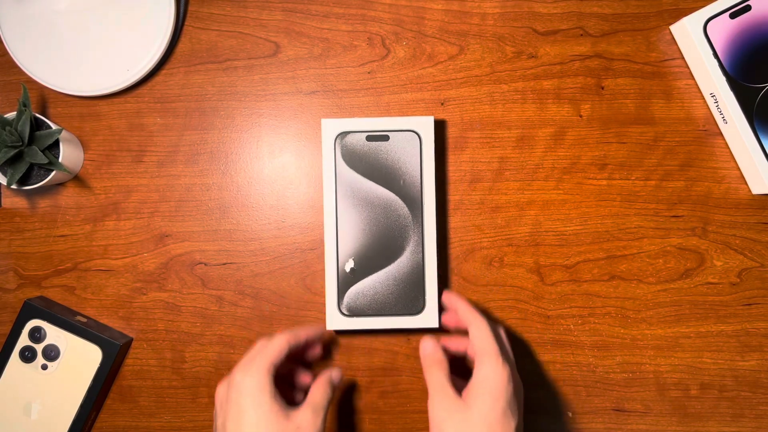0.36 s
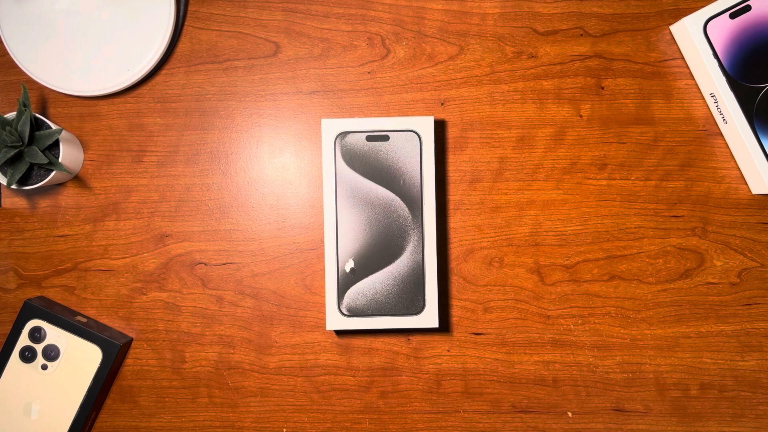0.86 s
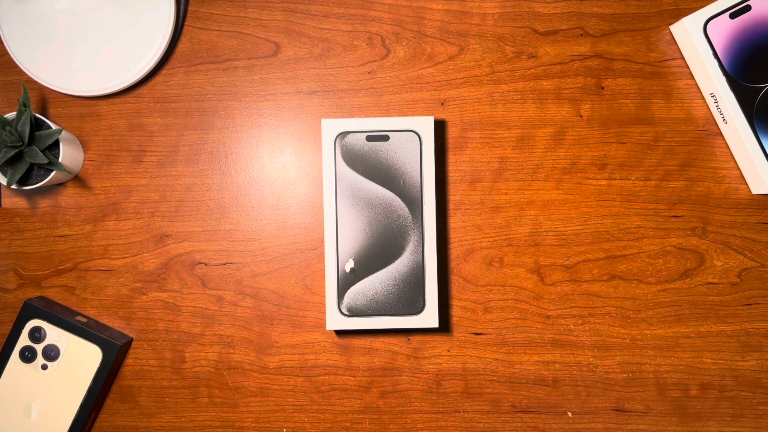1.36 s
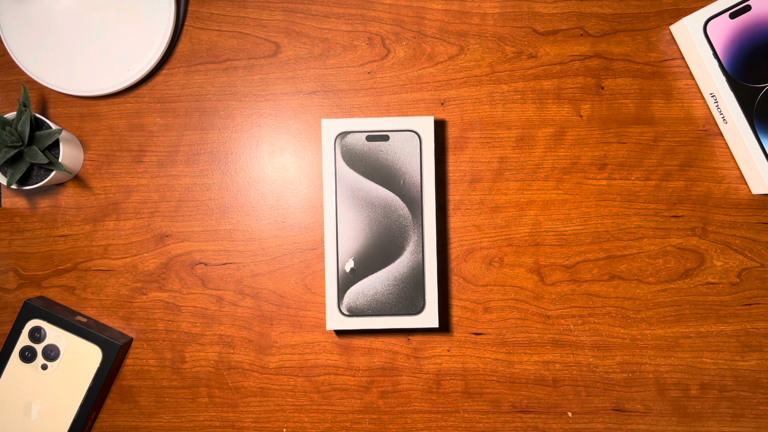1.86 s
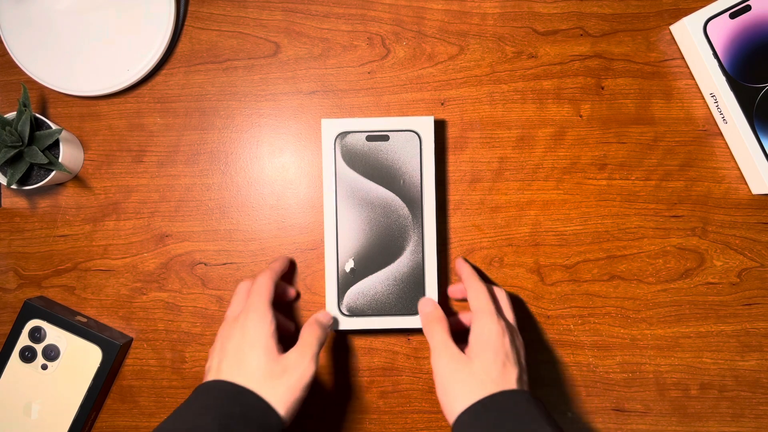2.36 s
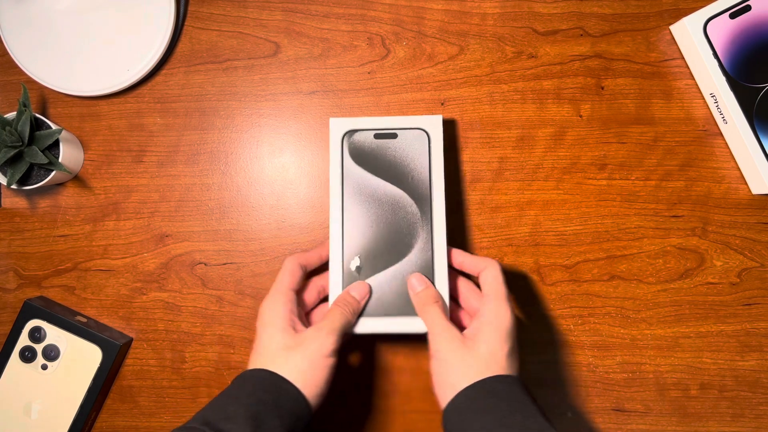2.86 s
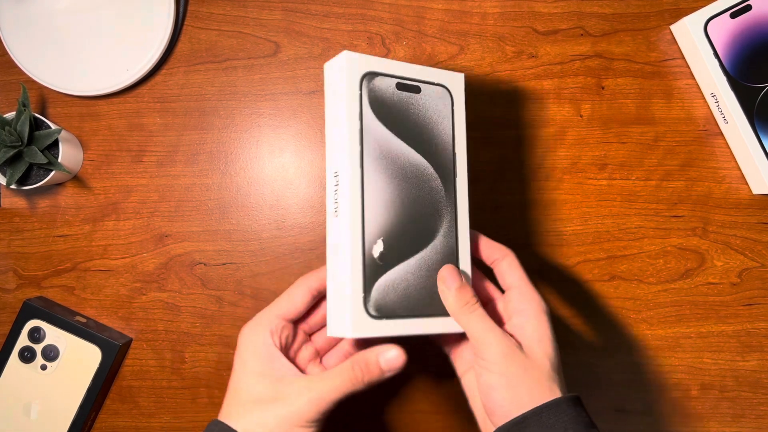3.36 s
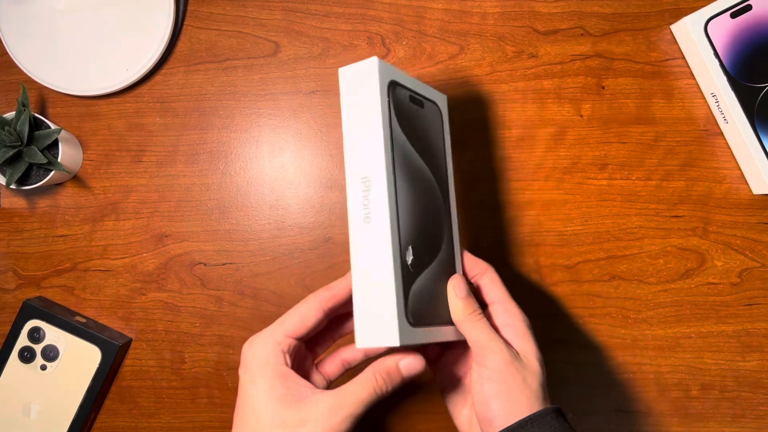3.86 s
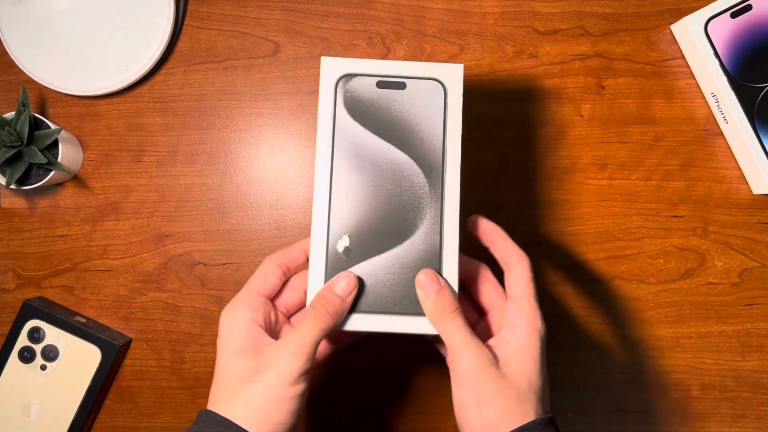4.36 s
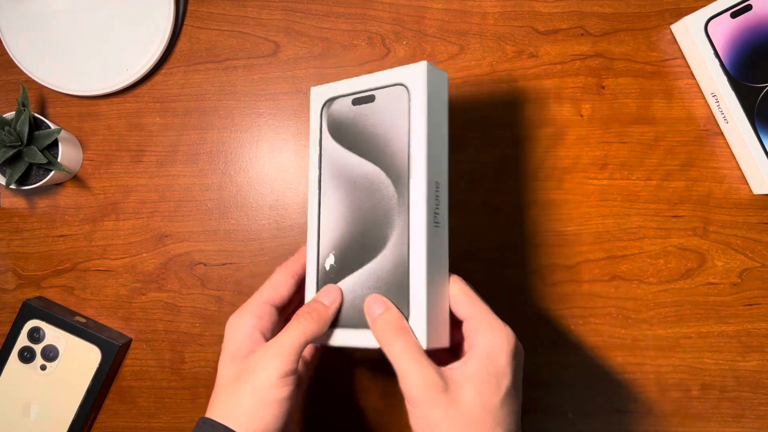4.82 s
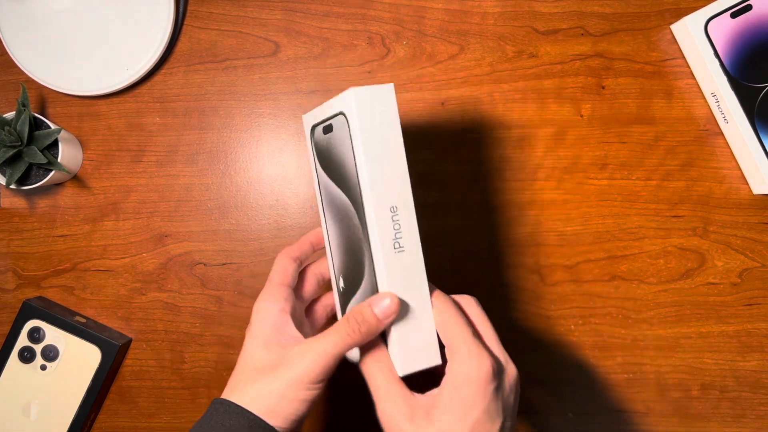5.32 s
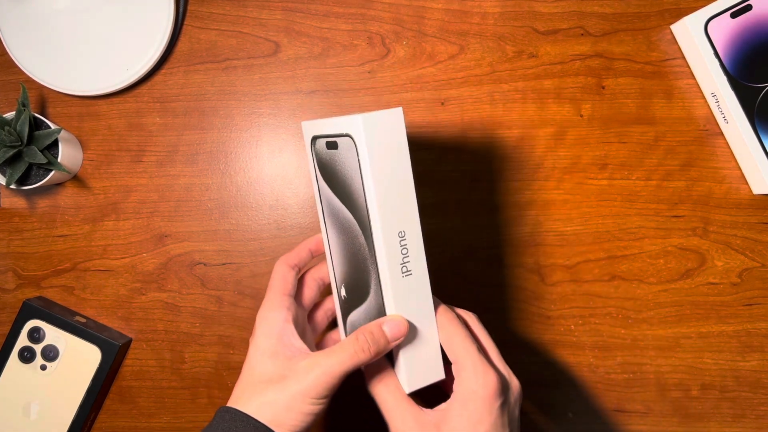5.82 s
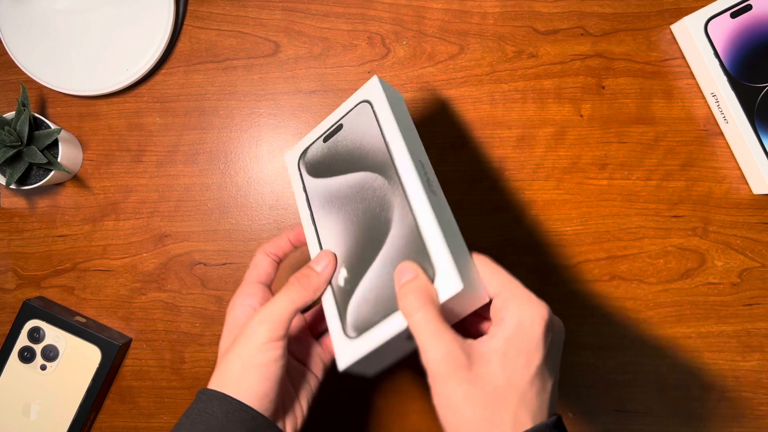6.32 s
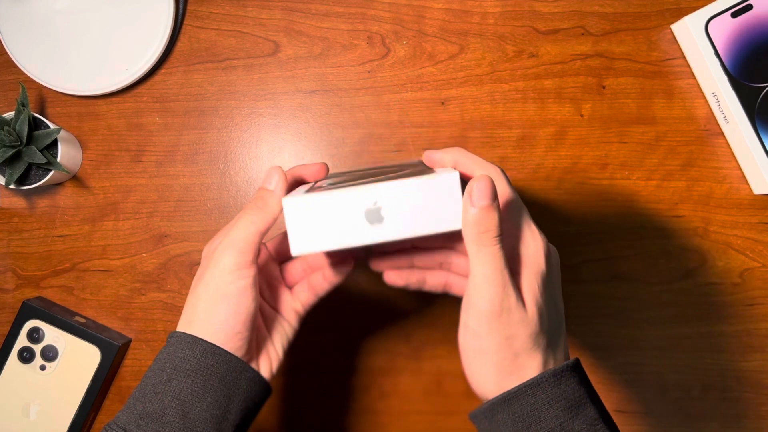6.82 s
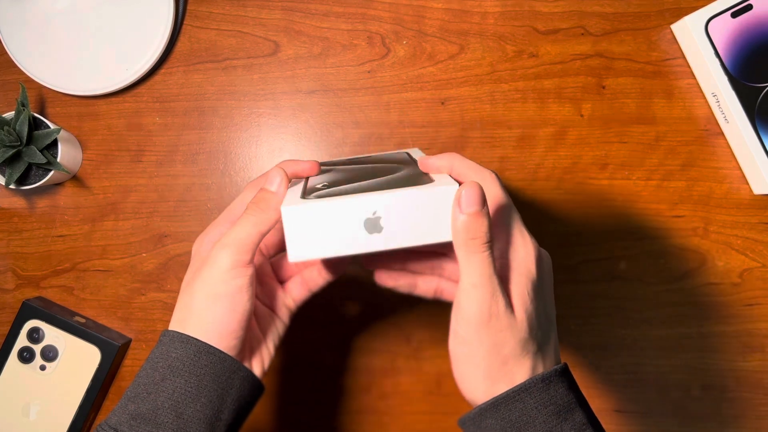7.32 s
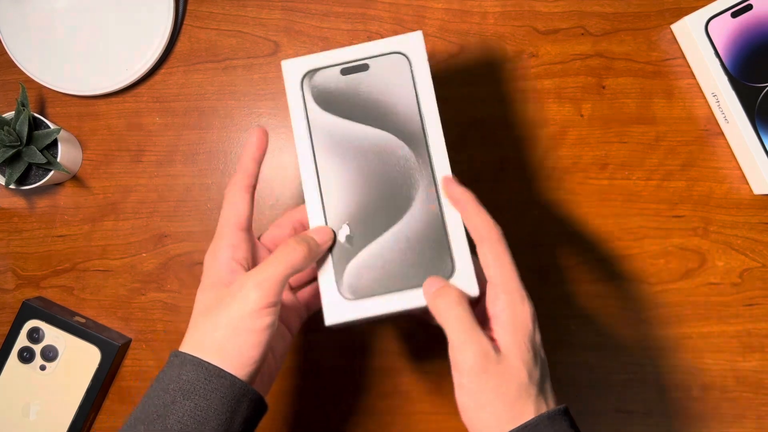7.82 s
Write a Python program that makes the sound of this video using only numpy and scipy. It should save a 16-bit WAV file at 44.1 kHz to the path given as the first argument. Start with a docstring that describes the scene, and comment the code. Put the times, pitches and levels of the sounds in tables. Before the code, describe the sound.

A quiet indoor room, heard close in stereo with a short room tail: low uneven rumble, smooth faint hiss and a barely audible hum early on. A wall clock gives a small double rattle about every second, starting near 0.75. At 0.1 to 0.8 there are two tiny finger touches and soft skin and sleeve rustle; then mostly ticking, with very faint rubbing from 1.5. From 2.35 to 2.7 fingers patter on a cardboard box on a wooden desk, and at 2.8 comes one loud, hollow knock, by far the strongest sound, with small contacts right after. A distant bird whistles thinly from 3.2 to 3.6. Light dry clicks cluster at 4.3 to 5.0, then a calmer second. From 6.0 to 6.8 the rustling is livelier with taps as the box is turned, and more small clicks and brushing follow at 7.4 to 7.85.

```python
"""At a wooden desk, fingers tap, lift and turn a small cardboard box close under a stereo microphone.
Contacts are noise clicks plus ringing modes of box and desk; one of them is a loud knock.
A wall clock rattles each second through resonances of its case; skin and sleeves rustle as patchy noise.
A far bird whistles in thin sine glides over a low noise rumble, a faint hum and hiss."""
import sys
import numpy as np
from scipy import signal
from scipy.fft import rfft, irfft, next_fast_len
from scipy.io import wavfile
from scipy.ndimage import uniform_filter1d, map_coordinates

SR = 44100
rng = np.random.default_rng(int(sys.argv[2]) if len(sys.argv) > 2 else 0)


def unload_wav(signal):
    """Save mono or channel-first audio to the path in sys.argv[1] as 16-bit WAV at rate SR, clipped to [-1, 1]."""
    wavfile.write(
        sys.argv[1],
        SR,
        np.round(np.clip(np.atleast_2d(signal).T, -1, 1) * 32767).astype(np.int16),
    )


def voltage_ratio(level):
    """Linear amplitude factor for a level in decibels (scalar or array-like)."""
    return 10 ** (np.asarray(level, float) / 20)


N = 350154  # length in samples


def unit(x):
    """Scale to rms 1."""
    return x / np.sqrt(np.mean(x ** 2) + 1e-20)


def along(points, hz):
    """Read a curve of (Hz, value) points on a log frequency axis."""
    f, v = np.transpose(points)
    return np.interp(np.log(hz + 1), np.log(f + 1), v)


def curve(rows):
    """One value per sample from (s, value) rows."""
    return np.interp(np.arange(N) / SR, *np.transpose(rows))


def wobble(rate):
    """A smooth random curve with rate knots a second."""
    knots = rng.standard_normal(int(N * rate / SR) + 4)
    return map_coordinates(knots, [np.arange(N) * rate / SR])


def filtered(x, response):
    """Multiply the spectrum of x by a complex response of frequency."""
    m = next_fast_len(x.shape[-1] + 8192)
    spectrum = rfft(x, m) * response(np.fft.rfftfreq(m, 1 / SR))
    return irfft(spectrum, m)[..., :x.shape[-1]]


def rush(spectrum, patchy_db):
    """Stereo noise of rms 1, partly alike in both ports, with patches of random gain in time and pitch."""
    # how alike the two ports hear the room: hz, likeness (0-1)
    alike = [(60, .92), (250, 0.84), (500, 0.44), (1000, 0.23), (1600, 1), (3000, 1), (5500, 0.69),
             (6800, 1), (8000, 0.35), (11000, 1), (12000, 1), (13000, 0.46)]
    z = signal.stft(rng.standard_normal((2, N)), nperseg=512)[2]
    field = uniform_filter1d(rng.standard_normal(z.shape[1:]), size=5, axis=0)
    field = uniform_filter1d(field, size=10, axis=1)
    pair = signal.istft(z * voltage_ratio(patchy_db * unit(field)), nperseg=512)[1][:, :N]

    def mid_side(hz):
        half_angle = np.arccos(np.clip(along(alike, hz), -1, 1)) / 2
        return voltage_ratio(along(spectrum, hz)) * [np.cos(half_angle), np.sin(half_angle)]

    mid, side = filtered(pair, mid_side)
    return unit(np.array([mid + side, mid - side]))


def add(track, s, sound):
    """Mix a short sound in at time s."""
    part = track[..., round(s * SR):][..., :sound.shape[-1]]
    part += sound[..., :part.shape[-1]]


def answer(x):
    """The room's tail, new for each sound: noise in which every frequency dies at its own speed."""
    # decay of the room: hz, t60_s
    room = [(100, 0.02), (400, 0.28), (1500, 0.31), (5000, 0.29), (12000, 0.02)]
    # left-right likeness of the tail, greatest in the lows: hz, likeness (0-1)
    tail_alike = [(100, 0.61), (350, 0.74), (600, 0.38), (2000, 0.18), (5000, 0.31)]
    hz, t, (a, b) = signal.stft(rng.standard_normal((2, SR // 2)), SR, nperseg=256)
    half_angle = np.arccos(np.clip(along(tail_alike, hz), -1, 1))[:, None] / 2
    mid, side = np.cos(half_angle) * a, np.sin(half_angle) * b
    decay = voltage_ratio(-60 * t / along(room, hz)[:, None])
    tail = signal.istft(np.array([mid + side, mid - side]) * decay, SR, nperseg=256)[1]
    late = np.pad(x, (200, 0))[None]  # the tail starts 200 samples late
    return signal.fftconvolve(late, tail / np.linalg.norm(tail[0]), axes=1)


def room_tone():
    """Uneven low rumble of the building and a wavering sine hum under a smooth hiss."""
    # course of the rumble before its wobble: time_s, level_db
    rumble_course = [(0.0, -54.5), (0.37, -59), (2.1, -60), (2.76, -54.5), (3.01, -59.5), (4.44, -64),
                     (5.2, -60.5), (7.2, -62.5), (7.55, -66), (7.94, -57.5)]
    # colour of the rumble: hz, density_db (per Hz, relative)
    air = [(12, -34), (20, -43), (36, -7.5), (64, 0.5), (108, -10), (166, -5.5), (201, -18), (222, -7),
           (256, -19), (286, -14), (325, -23.5), (387, -25), (426, -26), (461, -29.5), (900, -40),
           (1170, -77), (1980, -120)]
    # colour of the hiss: hz, density_db (per Hz, relative)
    hiss_colour = [(410, -29), (700, -15.5), (1210, -14.5), (1760, -1), (2600, -6), (2960, -13), (3290, -4),
                   (4000, -6.5), (4490, -2.5), (5830, -14), (6810, -12.5), (9070, -54), (11500, -24),
                   (12600, -18), (15700, -40)]
    # course of the faint hum before its wobble: time_s, level_db
    hum_course = [(.4, -85), (1, -79), (2.1, -78.5), (2.3, -92)]
    rumble = voltage_ratio(curve(rumble_course) + 0.9 * wobble(3.15) + 0.85 * wobble(18)) * rush(air, patchy_db=0.5)
    hum_hz = 425 + 3 * wobble(4.2)
    hum = voltage_ratio(curve(hum_course) + 2.3 * wobble(9.6)) * np.sin(2 * np.pi * np.cumsum(hum_hz) / SR)
    hiss = voltage_ratio(-72.5 + 1.3 * wobble(1.773)) * rush(hiss_colour, patchy_db=1.3)
    return rumble + hum + hiss


def bird():
    """Thin gliding whistles that swell, then stop short: sines with a straight glide in pitch."""
    # notes: start_s, length_s, from_hz, to_hz, level_db (once swelled)
    notes = [(3.19, 0.038, 4700, 5300, -74), (3.273, 0.065, 5330, 5430, -70),
             (3.417, .088, 5600, 4800, -63), (3.512, 0.098, 4120, 3670, -72.5)]
    swell_db, swell_share = 13, 0.62  # growth in dB, up to this share of the note
    out = np.zeros((2, N))
    for s, length, from_hz, to_hz, db in notes:
        u = np.arange(0, 1, 1 / (length * SR))  # share of the note gone by
        glide_hz = from_hz + (to_hz - from_hz) * u
        swell = voltage_ratio(db - swell_db * np.maximum(1 - u / swell_share, 0))
        tone = np.sin(2 * np.pi * np.cumsum(glide_hz) / SR) * swell
        # soft ends; a little stronger on the left
        add(out, s, tone * signal.windows.tukey(len(u), .3) * voltage_ratio([[.3], [-.3]]))
    return out


def rustle():
    """Sliding skin and cloth: each stroke of noise rises, holds and fades, catching unevenly."""
    # colour of the rustle as finally heard, with its gap near 9.7 kHz: hz, density_db (per Hz, relative)
    rustle_colour = [(880, -21), (1500, -8.5), (1760, -8), (7430, -3), (8780, -15), (9680, -71),
                     (10500, -5.5), (12400, -3.5), (13500, -3), (14500, -29), (15700, -9)]
    # strokes of skin and cloth: start_s, length_s, level_db (before the wobble)
    stroke_rows = [(0.16, 0.13, -78), (.32, 0.46, -75.5), (1.5, 0.48, -80.5), (1.95, 0.56, -76),
                   (2.562, 0.018, -70.5), (2.65, 0.026, -71), (2.74, 0.11, -68.5), (2.98, 0.22, -78.5),
                   (3.25, .07, -73.5), (4.055, .09, -74), (4.214, .13, -79.5), (4.412, 0.31, -76),
                   (4.788, .12, -72), (4.992, 0.026, -76), (5.974, 0.092, -74.5), (6.11, 0.042, -67.5),
                   (6.172, 0.13, -68.5), (6.318, 0.07, -67), (6.438, .16, -77), (6.61, 0.18, -73.5),
                   (6.817, 0.12, -78), (7.438, 0.28, -76), (7.769, 0.074, -70)]
    rise_db_s, fall_db_s, rest_db = 498, 204, -86  # dB a second up and down; level of hands at rest
    t = np.arange(N) / SR
    strokes = []
    for s, length, db in stroke_rows:
        before, after = np.maximum(s - t, 0), np.maximum(t - s - length, 0)
        strokes.append(db - rise_db_s * before - fall_db_s * after)
    level_db = np.maximum(np.max(strokes, axis=0), rest_db)
    catching_db = 1.5 * wobble(30) + 1.5 * wobble(300)
    return voltage_ratio(level_db + catching_db) * rush(rustle_colour, patchy_db=1.5)


def clock():
    """Each gear step is a burst of tiny knocks that rings the case of the clock and the wall behind it."""
    # once a second: release_s, release_db, delay_s until the gear lands, landing_db, rebound_db
    ticks = [(0.753, -57.5, .028, -51.5, -63), (1.752, -59, 0.036, -54, -72), (2.762, -46, 0.026, -54, -66),
             (3.757, -58, .032, -52, -72), (4.768, -49, 0.021, -48.5, -50), (5.764, -55, .039, -54, -70),
             (6.768, -50, .027, -51, -54), (7.778, -49.5, 0.017, -61, -67)]
    # resonances of the case: hz, width_hz, level_db
    case_modes = [(496, 140, -0.5), (826, 167, 0.5), (1465, 334, -0.5), (1956, 227, 2), (2390, 650, -5.5),
                  (3550, 610, -5), (4400, 620, -7.5)]
    rebound_s = .09  # after letting go
    out, t = np.zeros((2, N)), np.arange(SR // 8) / SR

    def case(f):
        total = 0
        for k, (c, w, db) in enumerate(case_modes):  # neighbouring modes have opposite sign
            total = total + (-1) ** k * voltage_ratio(db) * 1j * f * w / (c * c - f * f + 1j * f * w)
        return total

    steps = []
    for s, db, land_s, land_db, back_db in ticks:
        steps += [(s, db), (s + land_s, land_db), (s + rebound_s, back_db)]
    for s, db in steps:
        envelope = voltage_ratio(-60 * t / 0.067) * (1 - np.exp(-t / 0.0049))
        rattle = envelope * rng.standard_normal((2, len(t)))
        rattle *= rng.exponential(size=len(t)) ** 2  # separate tiny knocks of the teeth
        sound = filtered(rattle, lambda f: case(f) ** 2)  # squared: the case, then the wall
        sound *= voltage_ratio(db) / np.max(np.abs(sound))
        add(out, s, voltage_ratio(-0.5) * sound)
        add(out, s, voltage_ratio(-5) * answer(sound[0]))
    return out


def taps():
    """Each contact clicks through the air; the heavier box and desk start to ring a moment later."""
    # finger touches on the box: time_s, drive_db, thump_db and body_db (relative), click_hz (centre)
    touch_rows = [(0.0966, -60, -7, -13, 4500), (0.1738, -56.5, -13, -7, 1640),
                  (2.363, -51.5, -0.5, 2, 2850), (2.379, -60.5, 1, 6, 1430), (2.4258, -48, -17, 5, 2100),
                  (2.4689, -53, -2, 4.5, 2010), (2.575, -56, 13, -6, 2040), (2.5879, -69, 16, 7, 2000),
                  (2.6077, -71, 21, -12, 1840), (2.672, -61.5, 17, -18, 4020),
                  (2.7135, -57, -12, -11, 1830), (3.2988, -53, -5, -1, 5380),
                  (4.3312, -56.5, -12, -25, 4300), (4.431, -55, -19, -6, 5530),
                  (4.5648, -48, 0.5, -2, 5540), (4.6152, -49, -16, -7, 1890), (4.6787, -49, -12, -3, 4470),
                  (4.7315, -57, 1, -5, 3220), (5.014, -56, -17, -6, 4210), (6.222, -57, -17, -10, 2520),
                  (6.382, -50, -6.5, -19, 3200), (6.561, -59.5, -19, -1.5, 4400),
                  (6.6943, -64, -10, 6.5, 1880), (6.719, -61.5, -15, 3, 1940), (7.4249, -53, -19, -8, 4540),
                  (7.4553, -62, -4, 0, 3480), (7.4898, -56, -23, -12, 4160), (7.558, -64, -20, -22, 1820),
                  (7.5792, -58, -13, -13, 4250)]
    # one loud knock and some weaker contacts, most with strong high box modes:
    # time_s, drive_db, thump_db, body_db and high_db (relative)
    knock_and_weaker_rows = [(2.7823, -28, 9.5, 7, 3), (2.7925, -43.5, 17.5, 11.5, 14.5),
                             (2.8508, -45.5, -7, -24, -13), (2.8676, -52.5, 9, -11, -3),
                             (6.4083, -49, -6, -4.5, -0.5), (6.432, -68.5, 13, -10, -9)]
    # modes of the box on the desk: hz, level_db, t60_s (undamped)
    box = [(60.6, -14.5, 0.52), (126, -27, 0.21), (183.5, 4, 0.069), (208, -4, 0.081), (246, -6.5, 0.093),
           (332, 2.5, 0.044), (380, 4, 0.032), (524, -3, 0.066), (654, -8, 0.085), (713, -6, 0.079),
           (844, -8, 0.14), (962, 4, 0.026), (1143, -7.5, 0.048), (1238, -7.5, 0.062), (1380, -19, 0.068),
           (1730, -11.5, 0.043), (1920, -13, .04)]
    # colour of a click before its centre is stressed: hz, density_db (per Hz, relative)
    click_colour = [(400, -13), (900, 5), (2000, -3.5), (5000, -2.5), (8000, -11), (9500, -37), (12500, -7),
                    (15500, -16.5)]
    pad_db = -13.5  # a soft finger pad drives the high modes this far under the body
    lifted_s = 3  # from here the box is held in both hands
    shared_click_hz = 1860  # click centre of the loud knock and the weaker contacts listed with it
    out, t = np.zeros((2, N)), np.arange(SR // 5) / SR
    hz, level_db, t60 = np.transpose(box)[:, :, None]
    group = np.searchsorted([280, 680], hz)  # thump, body and high modes, split at these Hz
    contacts = [(s, db, thump_db, body_db, body_db + pad_db, centre_hz)
                for s, db, thump_db, body_db, centre_hz in touch_rows]
    contacts += [(*row, shared_click_hz) for row in knock_and_weaker_rows]
    for s, db, thump_db, body_db, high_db, centre_hz in contacts:
        def colour(f):  # strongest near the contact's own pitch
            return voltage_ratio(along(click_colour, f) - 3.5 * np.log2(f / centre_hz + 0.081) ** 2)

        envelope = voltage_ratio(-60 * t / 0.03) * (1 - np.exp(-t / 0.00026))
        click = envelope * unit(filtered(rng.standard_normal(len(t)), colour))

        spot_db = 1.5 * rng.standard_normal(hz.shape)  # every spot drives the modes a little differently
        strength_db = level_db + np.array([thump_db, body_db, high_db])[group] + spot_db
        late = np.maximum(t - .0025, 0)
        # loose card layers smear each mode's phase, the more the higher it is
        jitter = rng.standard_normal((len(hz), len(t))) * (late > 0)
        smear = hz / 60000 * np.cumsum(jitter, axis=1)
        life = t60 * (.6 if s > lifted_s else 1)  # palms damp the card
        build_up = 1 - np.exp(-late * hz / 0.6)  # over about one cycle
        swing = voltage_ratio(strength_db - 60 * late / life) * build_up
        # short waves leave different faces of the box and reach the two ports out of step
        step = np.minimum(hz / 1100, 1) * rng.uniform(-1, 1, hz.shape)
        phase = 2 * np.pi * hz * late + smear
        ring = np.sum(swing * np.sin([phase + step, phase - step]), axis=1)

        add(out, s + .001, voltage_ratio(db) * (voltage_ratio(-5) * click + voltage_ratio(-1) * ring))
        add(out, s, voltage_ratio(db) * answer(voltage_ratio(-12.5) * click + voltage_ratio(-10.5) * ring[0]))
    return out


def scene():
    """Everything at the microphone."""
    return room_tone() + bird() + rustle() + clock() + taps()


def low_pass(x):
    """Removes everything above the highest recorded frequency."""
    return signal.sosfilt(signal.butter(12, 15810, fs=SR, output="sos"), x)


def record(dry):
    """The microphone drops the deepest bass; its two ports differ in sensitivity and timing by frequency."""
    # level difference of the ports: hz, left_minus_right_db
    lean = [(60, -6), (300, -2), (700, -5), (1000, -2), (1500, -5.5), (3000, -10), (4700, -8.5),
            (6800, -1.5), (11000, 0)]
    # phase difference of the ports: hz, left_lead_rad
    lead = [(400, -0.39), (820, 1.5), (1400, 1.5), (2200, -0.93), (3200, -1.4), (4700, 0.1), (6800, -1),
            (8000, 1.5), (11000, 2), (12000, -2), (13000, 2.5)]

    def ports_response(hz):
        bass_cut = (1j * hz / (24 + 1j * hz)) ** 2  # two poles at 24 Hz
        tilt = voltage_ratio(along(lean, hz) / 2) * np.exp(.5j * along(lead, hz))  # half to each port
        return bass_cut * np.array([tilt, 1 / tilt])

    mix = filtered(dry, ports_response)
    return low_pass(mix)


dry = scene()
out = record(dry)
unload_wav(out)
```